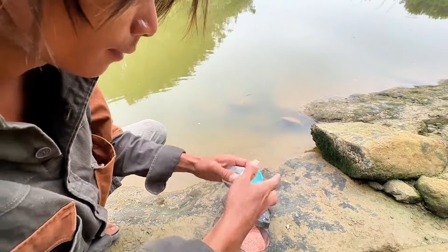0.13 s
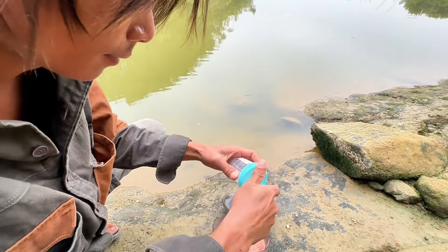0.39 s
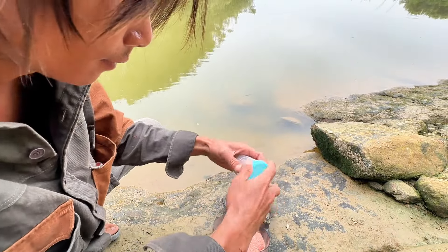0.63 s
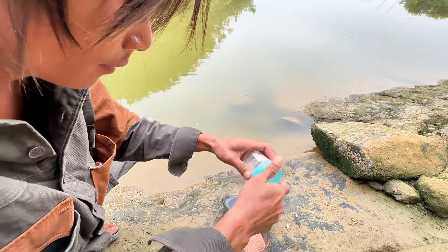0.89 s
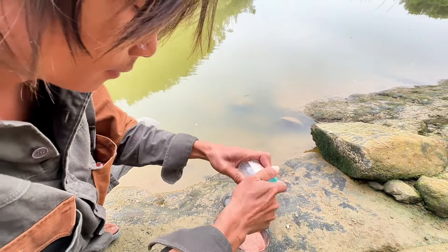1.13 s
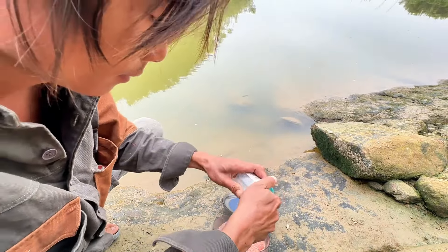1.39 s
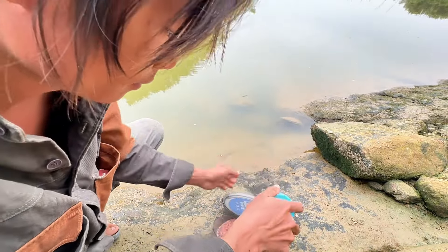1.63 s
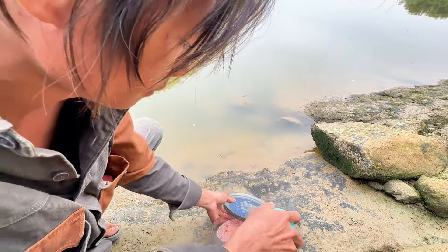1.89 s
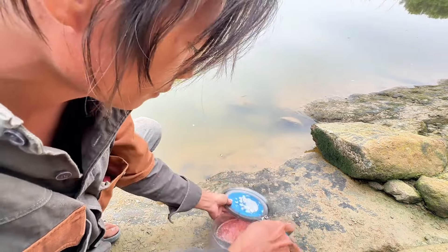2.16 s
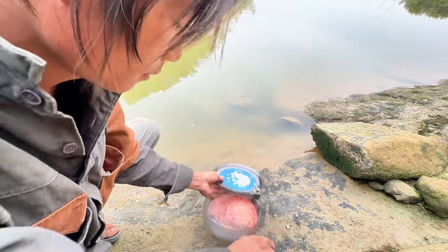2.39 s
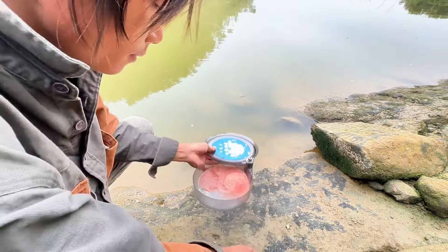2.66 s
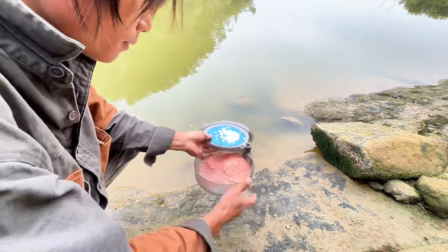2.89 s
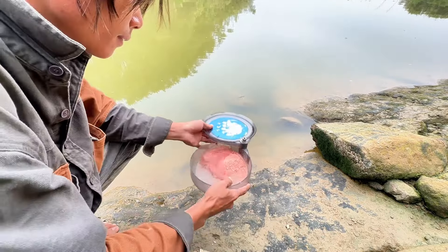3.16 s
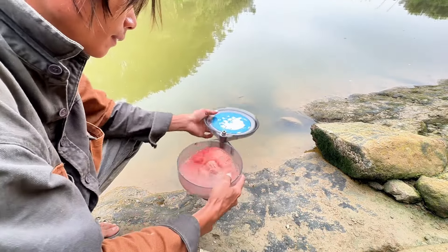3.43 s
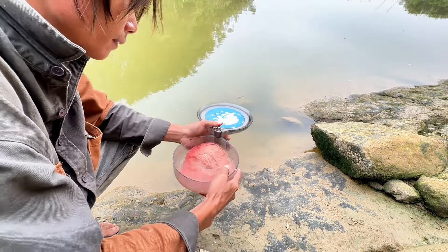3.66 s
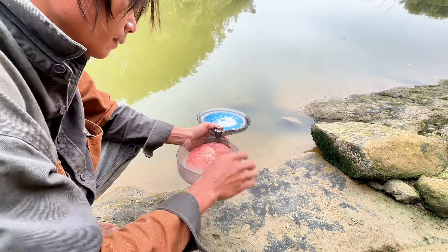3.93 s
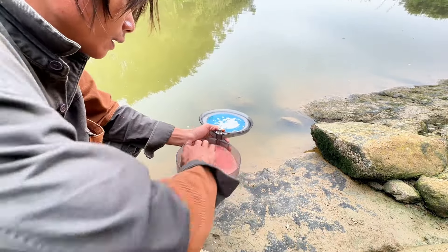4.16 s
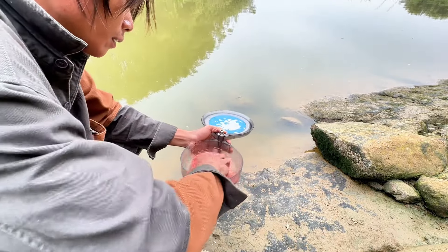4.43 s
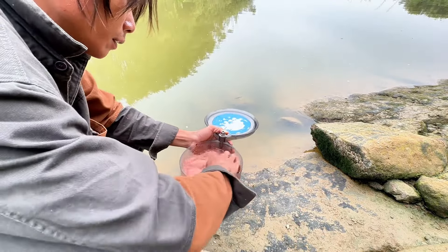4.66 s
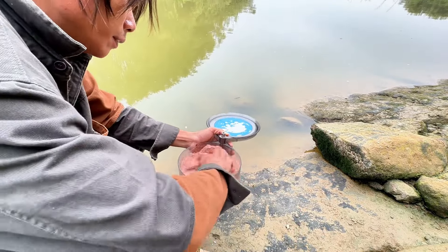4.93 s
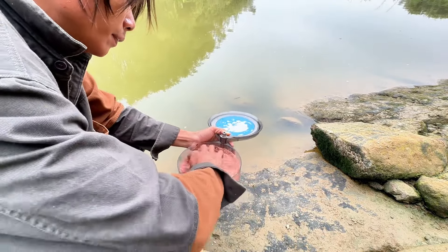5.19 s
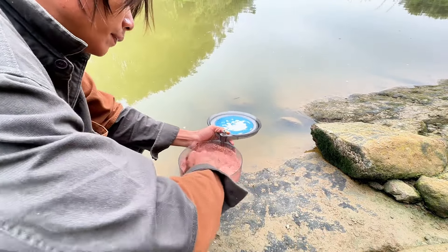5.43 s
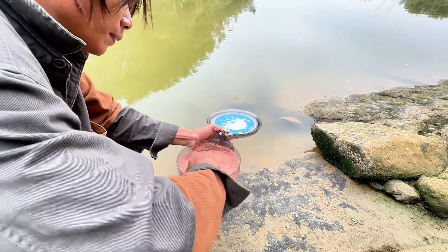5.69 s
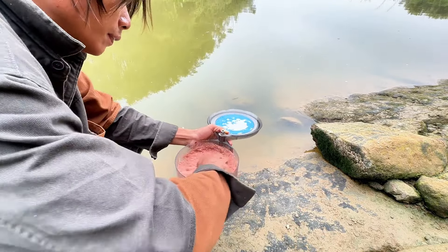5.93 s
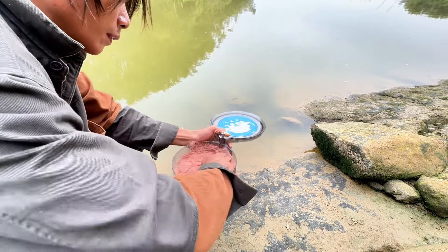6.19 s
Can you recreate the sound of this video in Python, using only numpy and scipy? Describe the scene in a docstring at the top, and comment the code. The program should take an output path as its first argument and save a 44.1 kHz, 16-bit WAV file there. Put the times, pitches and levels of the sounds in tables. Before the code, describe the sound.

Short gritty cap twists and hollow plastic knocks, one loud tub clatter, sleeve swishes, then quiet moist kneading over faint low wind.

```python
"""Outdoors by still water, hands twist a plastic cap on a bottle, knock and lift a plastic tub, then knead damp bait.
Cap, bait and a swishing jacket sleeve are shaped noise under strokes of pressure; knocks ring the plastic.
Damped tones make the small ticks and the crumbs.
A low wind rumble and a faint airy hiss, both shaped noise, lie underneath."""
import sys
import numpy as np
from scipy import signal
from scipy.io import wavfile
from scipy.ndimage import uniform_filter1d

SR = 44100
rng = np.random.default_rng(int(sys.argv[2]) if len(sys.argv) > 2 else 0)


def invert_db(level):
    """Linear amplitude ratio for a level in decibels (20 dB per decade), elementwise."""
    return 10 ** (np.asarray(level, dtype=float) / 20)


def transcribe(signal):
    """Save signal, clipped to [-1, 1], as a 16-bit WAV file at the path in sys.argv[1]."""
    frames = np.atleast_2d(signal).T
    limited = np.clip(frames, -1, 1)
    pcm = np.round(limited * 32767).astype(np.int16)
    wavfile.write(sys.argv[1], SR, pcm)


N = 278712
T = np.arange(N) / SR

# finger strokes in the bait: (hold begins [s], hold [s], time to fade 20 dB [s], rasp [dB], squelch [dB])
KNEAD_STROKES = [(4.11, 0.044, 0.04, -64, -61.5), (4.17, 0.026, 0.24, -56.5, -66.5),
                 (4.3, .01, 0.19, -65, -70), (4.545, .005, 0.118, -65.5, -76.5),
                 (4.59, 0.00437, .14, -63.5, -84), (4.69, .005, 0.15, -70.5, -74.5),
                 (4.836, .003, 0.023, -67, -73), (4.9, .04, 0.42, -68.5, -70.5),
                 (5.21, 0.0098, 0.12, -59.5, -74.5), (5.338, .005, 0.066, -69, -74.5),
                 (5.45, .003, 0.065, -60.5, -71.5), (5.49, 0.058, 0.074, -65, -73.5),
                 (5.66, 0.074, 0.29, -70.5, -72.5), (5.78, 0.081, 0.12, -65, -75),
                 (5.96, 0.0038, .12, -66.5, -68), (6.105, 0.025, 0.261, -63, -69.5),
                 (6.31, 0.013, 0.26, -69, -72)]
# how a kneading stroke sets in: (attack [share of fade], body starts early by [s], sag at the hold's ends [dB])
KNEAD_ONSET = (0.59, 0.004, 0.94)
# low, hollow part of sleeve and kneading: (frequency [Hz], relative level [dB per Hz])
HOLLOW_COLOUR = [(120, -18), (250, -6), (500, 1.5), (800, -2.5), (1200, -8.5), (1800, -33)]
# how alike left and right hear the bottle and cap:
# (frequency [Hz], likeness [0-1], right leads by [radians], left over right [dB])
BOTTLE_STEREO = [(150, 1, 0.1, 3), (350, 0.9, 1, 1.5), (550, 0.88, 0.76, 3.5), (900, 0.7, 1.14, -4.5),
                 (1415, 0.59, 0, -0.5), (2110, 0.74, 0.3, -2), (3013, 0.43, -2.5, -1),
                 (4020, 0.41, -0.94, 1), (5860, 0.097, 3, 3.5), (9000, 0.29, -0.5, -0.5),
                 (10000, 0.93, -1.32, -2.5)]
# the same for sleeve and bait:
# (frequency [Hz], likeness [0-1], right leads by [radians], left over right [dB])
SLEEVE_BAIT_STEREO = [(150, .85, 1.5, 3.5), (339, 0.85, 0.5, 2.5), (550.5, 0.86, 1.55, 4),
                      (980, 0.25, 0.5, 3.5), (2010, .5, -0.85, 2), (3000, 0.34, -1.5, -1),
                      (3970, 0.18, -4, 1), (6200, .3, 0, 4), (9000, 0.12, 2.5, -6), (10200, .5, -1.11, -2)]


def evened(x):
    """Scales a sound to an rms of 1."""
    return x / np.sqrt(np.mean(x ** 2) + 1e-20)


def read(points, hz):
    """Reads a table between its points, along a logarithmic frequency axis."""
    f, value = np.transpose(points)
    return np.interp(np.log(hz + 1), np.log(f + 1), value)


def stereo_at(table, hz):
    """Likeness, phase and balance of left and right at these frequencies."""
    f, *columns = np.transpose(table)
    same, lead, pan_db = (read(np.transpose([f, column]), hz) for column in columns)
    return np.clip(same, 0, 1), lead, pan_db


def add(mix, s, sound, pan_db):
    """Adds a sound at a time, leaning left (positive) or right (negative)."""
    part = mix[:, round(s * SR):][:, :sound.shape[-1]]
    gains = invert_db(np.array([[0.5], [-0.5]]) * pan_db)
    part += gains * sound[..., :part.shape[1]]


def noise(colour, stereo, rings=(), patchy_db=0.0, size=256):
    """Stereo noise from random short-time spectra, with resonances and drifting louder and softer patches."""
    frames = 4 * N // size + 5
    hz = np.fft.rfftfreq(size, 1 / SR)
    a, b, c, d, patches = rng.standard_normal((frames, len(hz), 5)).T
    patches = uniform_filter1d(patches, size=5, axis=0)  # across frequency
    patches = evened(uniform_filter1d(patches, size=9, axis=1))  # across time
    db = read(colour, hz)
    for f, width, top in rings:
        db = db + top / (1 + (2 * (hz - f) / width) ** 2)
    same, lead, pan_db = np.array(stereo_at(stereo, hz))[:, :, None]
    left = a + 1j * b
    right = same * left * np.exp(1j * lead) + np.sqrt(1 - same ** 2) * (c + 1j * d)
    spectra = np.array([left * invert_db(pan_db / 2), right * invert_db(-pan_db / 2)])
    spectra = spectra * invert_db(db[:, None] + patchy_db * patches)
    sound = signal.istft(spectra, nperseg=size, noverlap=3 * size // 4)[1]
    return evened(sound[:, :N])


def grainy(depth_db, grain_s):
    """Stick and slip: the level jumps in short random grains."""
    width = max(round(grain_s * SR), 1)
    jumps = evened(uniform_filter1d(rng.standard_normal(N), width))
    return evened(invert_db(depth_db * jumps))


def pressure(strokes, onset, t):
    """Rasp and body gain: attack, arched hold, fade; overlapping strokes add as power."""
    s, hold, fade, rasp_db, body_db = np.transpose(strokes)[:, :, None]
    share, lead, arch_db = onset
    fade_db = 20 * np.maximum(t - s - hold, 0) / fade
    sag_db = fade_db + arch_db * np.minimum((2 * (t - s) / hold - 1) ** 2, 1)
    rasp_attack_db = 20 * np.maximum(s - t, 0) / (share * fade)
    body_attack_db = 20 * np.maximum(s - lead - t, 0) / (share * fade)
    rasp = invert_db(rasp_db - sag_db - rasp_attack_db)
    body = invert_db(body_db - sag_db - body_attack_db)
    return np.linalg.norm(rasp, axis=0), np.linalg.norm(body, axis=0)


def rubbing(strokes, onset, colour, rings, low, stereo, grain_db, grain_s, body_grain_db, patchy_db):
    """Rubbing makes a bright rasp and a lumpy hollow body, both following the strokes' pressure."""
    coarse = T[::32]
    rasp, body = (np.interp(T, coarse, gain) for gain in pressure(strokes, onset, coarse))
    bright = noise([(500, -40)] + colour, stereo, rings, patchy_db, size=512)
    hollow = noise(low, stereo, (), patchy_db, size=512)
    rasping = rasp * grainy(grain_db, grain_s) * bright
    lumps = body * grainy(body_grain_db, 0.011) * hollow
    return rasping + lumps


def crack(t60):
    """The bright snap of first contact and its short hiss, only slightly alike left and right."""
    t = np.arange(1500) / SR
    left, right, both = rng.standard_normal((3, len(t)))
    band = signal.butter(2, [1500, 9500], "bandpass", fs=SR, output="sos")
    snap = signal.sosfilt(band, np.array([left, right]) + 0.19 * both)
    decay = invert_db(-60 * t / t60) + 0.081 * invert_db(-60 * t / 0.05)
    return snap * (1 - np.exp(-t / 0.00056)) * decay


def knocks(rows, modes, stereo, below_db, rise_ms, crack_t60, delay_s):
    """Each blow feeds the modes nearest its favoured pitch, each detuned a little at random; low modes swell later.
    below_db is lost per octave below that pitch; rise_ms is the swell time at 1 kHz."""
    out = np.zeros((2, N))
    t = np.arange(3000) / SR
    f, top, t60 = np.transpose(modes)[:, :, None]
    alike, lead, side_db = stereo_at(stereo, f)
    rise = rise_ms / np.sqrt(f * 1000)  # seconds
    for s, db, hz, bright_db, soft_db in rows:
        phase, detune, stray = rng.random((len(modes), 3)).T[:, :, None]
        octaves = np.log2(f / hz)
        loss_db = np.where(octaves > 0, soft_db * octaves, -below_db * octaves)
        share = invert_db(top - loss_db)
        share *= invert_db(db) / np.linalg.norm(share)
        swell = 1 - np.exp(-(t / rise) ** 2)
        shape = share * swell * invert_db(-60 * np.maximum(t - rise, 0) / t60)
        angle = 2 * np.pi * (f * (1 + 0.05 * (detune - 0.5)) * t + phase)
        # the less alike the two sides, the more their phases stray
        turn = lead + np.arccos(alike) * np.sqrt(12) * (stray - 0.5)
        left = (shape * invert_db(side_db / 2) * np.sin(angle)).sum(0)
        right = (shape * invert_db(-side_db / 2) * np.sin(angle + turn)).sum(0)
        start = s + delay_s  # a small fixed delay before each knock sounds
        add(out, start, np.array([left, right]), 0.6)
        add(out, start, invert_db(db + bright_db + 1.9) * crack(crack_t60), 0.6)
    return out


def twist_cap():
    """The cap sticks and slips on the bottle: a grainy, ringing scrape over the bottle's hollow body."""
    # twisting strokes: (hold begins [s], hold [s], time to fade 20 dB [s], rasp [dB], hollow body [dB])
    twist_strokes = [(.03, 0.0044, 0.2, -71.5, -74), (.205, 0.0055, 0.01, -64, -56.5),
                     (.232, 0.084, 0.0074, -45, -53.5), (.33, .005, 0.06, -71, -69),
                     (.565, .01, .02, -66, -58), (.588, 0.085, 0.02, -48, -54), (.716, .03, .07, -61, -63),
                     (1.02, 0.047, 0.0039, -51, -60), (1.157, 0.0042, 0.04, -63, -75),
                     (1.372, 0.0039, .07, -72, -74)]
    # how a twist sets in: (attack [share of fade], body starts early by [s], sag at the hold's ends [dB])
    twist_onset = (0.74, 0.016, 3.16)
    # colour of the scrape: (frequency [Hz], relative level [dB per Hz])
    scrape_colour = [(710, -65), (1200, -13), (1590, -5.5), (1850, -2), (2480, -8), (3790, -7.5),
                     (7410, -11), (10000, -11), (14700, -14), (16000, -37)]
    # rings in the scrape: (frequency [Hz], width [Hz], boost [dB])
    cap_rings = [(1790, 200, -4), (3900, 128, 5), (6316, 355, 5.5), (10070, 520, 4)]
    # the bottle's body under the scrape: (frequency [Hz], relative level [dB per Hz])
    bottle_body = [(90, -10.5), (140, -0.5), (250, -7.5), (500, 1), (800, -3.5), (1200, -14.5),
                   (1800, -29.5)]
    return rubbing(twist_strokes, twist_onset, scrape_colour, cap_rings, bottle_body, BOTTLE_STEREO,
                   grain_db=1.1, grain_s=0.00081, body_grain_db=3.4, patchy_db=1.5)


def knock_bottle():
    """Blows on the bottle set its plastic ringing in a few quickly dying modes."""
    # blows: (time before a small delay [s], level [dB], favoured pitch [Hz],
    # crack against level before a shared gain [dB], softness: loss above that pitch [dB per octave])
    bottle_blows = [(.021, -50, 544, -25, 8), (.042, -49.5, 479, -16.5, 9.5), (.177, -41, 390, -31, 18),
                    (.188, -25.5, 390, -31, 13.5), (.2, -28, 567, -16, 13.5), (.213, -42, 536, -30, 16),
                    (.547, -38.5, 350, -20, 17), (.559, -43, 439, -22, 17), (.643, -35, 425, -13, 14),
                    (.656, -44, 524, -11, 1), (.703, -50, 500, -25, 16), (.715, -40, 690, -25, 13),
                    (.721, -46, 800, -22, 12), (.73, -46, 865, -22, 15), (1.019, -41, 684, -9, 7),
                    (1.156, -51, 1170, -7, 1), (1.373, -48, 810, -17, 13), (1.495, -50, 810, -20, 12.5),
                    (1.982, -50, 355, -15.5, 10.5), (2.057, -36.5, 939, -18.5, 5.5),
                    (2.065, -42.5, 896, -16, 16)]
    # ringing modes: (frequency [Hz], relative level [dB], time to fade 60 dB [s])
    bottle_modes = [(349, -12.5, 0.027), (515, -5, 0.011), (635, -15, 0.03), (810, -8, 0.042),
                    (1311, -5, 0.017), (1950, -0.5, 0.019), (2580, 3, 0.012), (3580, -14, .01)]
    return knocks(bottle_blows, bottle_modes, BOTTLE_STEREO,
                  below_db=6.1, rise_ms=1.25, crack_t60=0.011, delay_s=0.0003)


def knock_tub():
    """Blows on the tub ring many modes, from low thuds to bright clacks."""
    # blows: (time before a small delay [s], level [dB], favoured pitch [Hz],
    # crack against level before a shared gain [dB], softness: loss above that pitch [dB per octave])
    tub_blows = [(2.412, -49.5, 302, -24, 12.6), (2.68, -12, 900, -22, 5.8), (2.703, -51, 855, -17, 6),
                 (2.744, -31, 745, -28, 8.9), (2.796, -45, 773, -13, 7), (2.81, -20.5, 1000, -14, 5),
                 (2.827, -36.5, 360, -32.5, 6.7), (2.864, -27.5, 940, -41.5, 13.5),
                 (2.891, -33, 780, -16, 4.2), (2.926, -42, 414, -20, 14), (2.972, -39.5, 2300, -7, 6.3),
                 (3.009, -38.5, 343, -29, 5.4), (3.201, -50, 200, -23, 11), (3.217, -49, 220, -22, 12),
                 (3.233, -50, 150, -25, 16), (3.518, -53, 400, -20, 16), (3.527, -53, 190, -25, 16),
                 (4.105, -45, 586, -21, 9.1), (4.121, -55, 2130, -13.5, 7), (4.128, -41, 2100, -18, 6),
                 (4.129, -44, 620, -30, 14), (4.152, -46.5, 730, -17.5, 12), (4.299, -55.5, 2000, 1, 5.6),
                 (5.404, -50, 258, -3.5, 5.4), (5.44, -53.5, 1410, 5.5, 7.6), (5.454, -59.5, 2060, -15, 7),
                 (5.848, -52.5, 708, 0, 6)]
    # ringing modes: (frequency [Hz], relative level [dB], time to fade 60 dB [s])
    tub_modes = [(130.2, -14.5, .06), (178, -14, 0.045), (250, -6.5, .038), (358, -5.5, .035),
                 (478, -6.5, .035), (650, -7, 0.031), (810, -1, .027), (934, -4, 0.02), (1343, -3, 0.032),
                 (1600, -10, .022), (1820, -7.5, .028), (2153, -8.5, 0.025), (2396, -10, 0.02),
                 (2953, -10.5, 0.032), (3465, -9.5, 0.021), (4280, -13, .018), (4880, -13, .018)]
    # how alike the two sides hear the tub:
    # (frequency [Hz], likeness [0-1], right leads by [radians], left over right [dB])
    tub_stereo = [(200, .97, .3, 1.5), (380, .93, .5, 2), (700, .92, .6, -3), (1400, .88, -.8, -3),
                  (2100, .85, 0, -4), (2900, .65, -.9, -4), (4000, .5, -.7, 0), (5000, .4, -1.6, 2)]
    return knocks(tub_blows, tub_modes, tub_stereo,
                  below_db=4.5, rise_ms=1.2, crack_t60=0.024, delay_s=0.0016)


def knead_bait():
    """Fingers press damp bait: a grainy rasp that rings the tub, over a lumpy squelch."""
    # colour of the rasp: (frequency [Hz], relative level [dB per Hz])
    bait_colour = [(710, -24.5), (1200, -6), (2680, -12), (2950, -8.5), (6160, -9), (7410, -13),
                   (10000, -8), (14800, -14.5), (16000, -21)]
    # the tub ringing under the fingers: (frequency [Hz], width [Hz], boost [dB])
    tub_rings = [(2050, 440, 10), (2625, 113, 22), (10100, 410, -0.5)]
    return rubbing(KNEAD_STROKES, KNEAD_ONSET, bait_colour, tub_rings, HOLLOW_COLOUR, SLEEVE_BAIT_STEREO,
                   grain_db=1.7, grain_s=0.004, body_grain_db=2.8, patchy_db=2.4)


def pop_crumbs():
    """Small irregular pops of damp crumbs, damped tones that grow louder as the fingers rasp harder."""
    per_s, spread_db, level_db = 40.0, 3.3, -26.0  # average pops a second; level before the push
    first = KNEAD_STROKES[0][0]
    span = N / SR - first
    out = np.zeros((2, N))
    t = np.arange(600) / SR
    count = 400  # possible pops, thinned at random
    for when, pitch, size, pan, keep in rng.random((count, 5)):
        if keep < per_s * span / count:
            at = first + when * span
            cycles = 400 * 9 ** pitch * t  # 400 to 3600 Hz
            push = pressure(KNEAD_STROKES, KNEAD_ONSET, at)[0] ** 0.59
            pop_db = level_db - spread_db * np.log(1 - 0.98 * size)
            pop = np.sin(2 * np.pi * cycles) * cycles * np.exp(-cycles / 1.24)
            add(out, at, push * invert_db(pop_db) * pop, 8 * (pan - 0.4))
    return out


def tick_tub():
    """Crumbs and fingertips tick on the tub wall: a few damped cycles and a snap."""
    # ticks, levels before shared gains: (time [s], level [dB], pitch [Hz], crack against level [dB],
    # left over right [dB])
    tick_rows = [(3.345, -52, 1157, -36, 9.5), (4.481, -58, 1330, -31.5, 0), (4.487, -58, 450, -20, 9),
                 (4.531, -62, 1170, -1.5, -1.5), (4.688, -60, 647, -16.5, 5), (4.743, -54.5, 852, -24, 5),
                 (5.188, -47.5, 2680, -22.5, -6), (5.661, -57, 640, -27, 3.5), (5.684, -61, 402, -13.5, -1),
                 (5.751, -52.5, 2070, -16, -4), (5.777, -55.5, 1470, -16, -3),
                 (6.128, -53.5, 658, -15.5, -1), (6.208, -51.5, 1620, -27.5, 1.5),
                 (6.298, -51.5, 2670, -28, 0.5)]
    out = np.zeros((2, N))
    t = np.arange(1500) / SR
    for s, db, hz, bright_db, pan_db in tick_rows:
        cycles = hz * t
        shape = np.exp(-cycles / 3.0) * (1 - np.exp(-cycles / 1.87))
        add(out, s, invert_db(db + 3.0) * np.sin(2 * np.pi * cycles) * shape, pan_db)
        add(out, s, invert_db(db + bright_db + 12.5) * crack(0.02), pan_db)
    return out


def swish_sleeve():
    """Cloth rubbing makes a soft bright swish over a low rustle."""
    # sleeve movements: (hold begins [s], hold [s], time to fade 20 dB [s], swish [dB], low rustle [dB])
    sleeve_strokes = [(1.82, 0.012, 0.42, -73.5, -75.5), (2.41, 0.185, 0.36, -62.5, -65),
                      (2.69, 0.0066, 0.114, -61.5, -66), (2.8, 0.019, .2, -74, -65),
                      (2.9, 0.0066, 0.22, -61.5, -59.5), (3.12, 0.017, 0.33, -65, -69.5),
                      (3.25, 0.053, 0.17, -63.5, -73), (3.45, 0.038, .2, -74.5, -88),
                      (3.64, .01, .15, -73, -76.5), (3.75, .005, .05, -62.5, -76),
                      (3.93, 0.087, 0.36, -74.5, -76.5)]
    # how a movement sets in: (attack [share of fade], body starts early by [s], sag at the hold's ends [dB])
    sleeve_onset = (0.93, .001, 1.2)
    # colour of the swish: (frequency [Hz], relative level [dB per Hz])
    cloth_colour = [(710, -32.5), (1200, -3), (2110, -3), (5130, -7.5), (5590, -8.5), (7490, -14),
                    (10000, -8.5), (12500, -12), (14800, -18), (16000, -58.5)]
    return rubbing(sleeve_strokes, sleeve_onset, cloth_colour, (), HOLLOW_COLOUR, SLEEVE_BAIT_STEREO,
                   grain_db=1.5, grain_s=0.008, body_grain_db=2.87, patchy_db=1.6)


def wind():
    """Lumpy low rumble, nearly alike left and right; its slow swell follows a chance level curve."""
    # colour of the rumble: (frequency [Hz], relative level [dB per Hz])
    wind_colour = [(18, -22.5), (40, -2), (55, -2.5), (80, -4), (100, -9.5), (130, -21.5), (200, -32.5),
                   (400, -47.5)]
    # how alike the two sides are:
    # (frequency [Hz], likeness [0-1], right leads by [radians], left over right [dB])
    wind_stereo = [(20, .9, .01, .7), (200, .82, .01, .7)]
    # pitches the rumble lingers on: (frequency [Hz], width [Hz], boost [dB])
    moan_rings = [(41, 9, 5), (67, 14, 8)]
    # level of the rumble: (time [s], level [dB])
    rumble_levels = [(0.0, -72.5), (0.26, -56), (0.42, -66), (0.58, -58), (1.21, -63.5), (2.76, -59),
                     (2.92, -62.5), (3.68, -62.5), (3.7, -70), (3.8, -58.5), (4.91, -59.5), (5.0, -70.5),
                     (5.03, -59), (5.14, -62), (5.65, -64), (5.74, -77), (5.79, -60), (6.32, -62.5)]
    s, db = np.transpose(rumble_levels)
    rumble = noise(wind_colour, wind_stereo, moan_rings, patchy_db=2.1, size=8192)
    power = (rumble ** 2).mean(0)
    own_swell = np.sqrt(uniform_filter1d(power, size=SR // 6) + 0.013)
    return invert_db(np.interp(T, s, db)) * rumble / own_swell


def airy_hiss():
    """A faint hiss: steady coloured noise with small drifting patches."""
    # colour of the hiss: (frequency [Hz], relative level [dB per Hz])
    air_colour = [(90, -15.5), (130, 2), (200, -2.5), (380, -7.5), (600, -10.5), (950, -14.5), (1400, -12),
                  (2600, -13.5), (4700, -17), (5300, -26.5), (8000, -31), (10000, -27), (12000, -50.5),
                  (16000, -38)]
    # how alike the two sides are:
    # (frequency [Hz], likeness [0-1], right leads by [radians], left over right [dB])
    air_stereo = [(100, 0.98, -0.024, 3), (400, 0.1, -.3, 3), (900, .2, 0, 1), (2000, 0.4, 0.054, 10),
                  (3510, 0.1, 0, 14), (6000, 0.3, 0, 6.5), (9000, .3, 0, -3), (10760, .6, 0, -3)]
    return invert_db(-71.5) * noise(air_colour, air_stereo, patchy_db=1.44, size=1024)


def scene():
    """Adds all the sources in stereo."""
    bottle = twist_cap() + knock_bottle()
    tub = knock_tub() + tick_tub()
    bait = knead_bait() + pop_crumbs()
    background = wind() + airy_hiss()
    return bottle + tub + bait + swish_sleeve() + background


def low_pass(x):
    """Removes everything above the highest recorded frequency."""
    return signal.sosfilt(signal.butter(12, 16340, fs=SR, output="sos"), x)


def record(dry):
    """A treble band is made mono; the deepest bass and the top are cut."""
    # band that is made mono: (lower edge [Hz], upper edge [Hz])
    mono_band = [11000, 14000]
    mid = (dry[0] + dry[1]) / 2
    side = (dry[0] - dry[1]) / 2
    side_cut = signal.butter(6, mono_band, "bandstop", fs=SR, output="sos")
    side = signal.sosfiltfilt(side_cut, side)
    bass_cut = signal.butter(6, 37, "highpass", fs=SR, output="sos")
    top_cut = signal.ellip(8, 0.5, 60, 15800, fs=SR, output="sos")
    stereo = np.array([mid + side, mid - side])
    finished = signal.sosfilt(np.vstack([bass_cut, top_cut]), stereo)
    return low_pass(finished)


dry = scene()
out = record(dry)
transcribe(out)
```